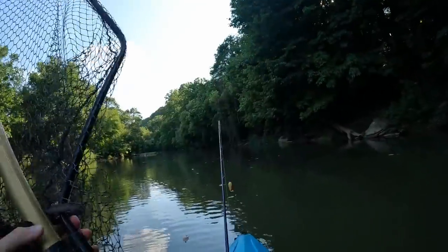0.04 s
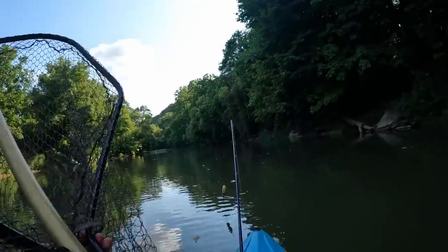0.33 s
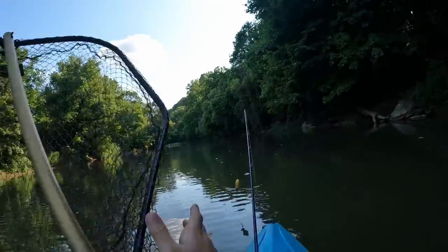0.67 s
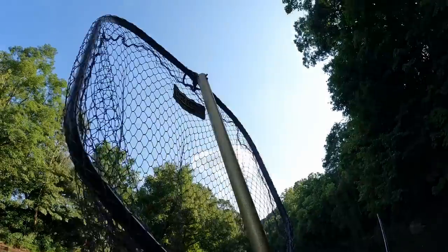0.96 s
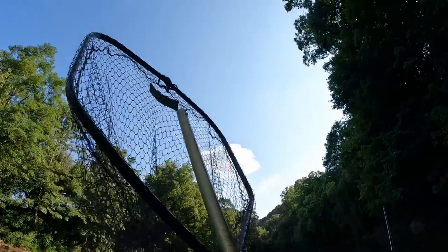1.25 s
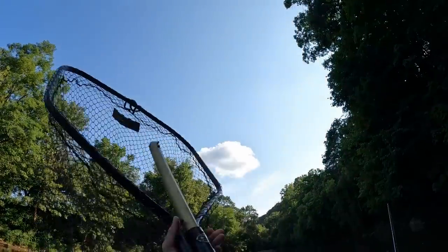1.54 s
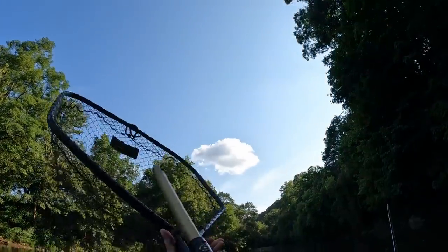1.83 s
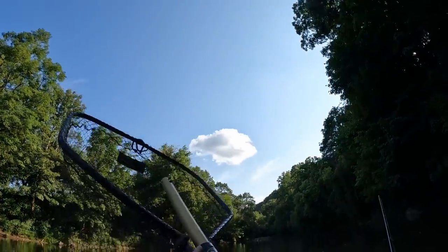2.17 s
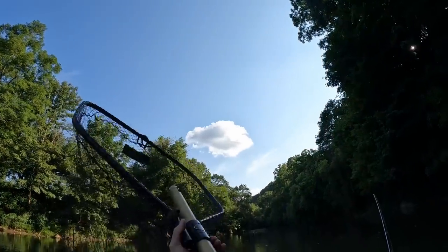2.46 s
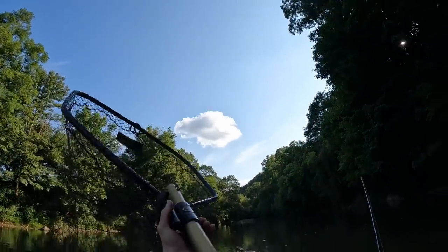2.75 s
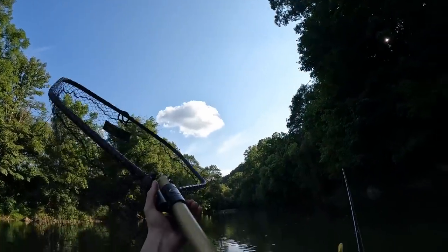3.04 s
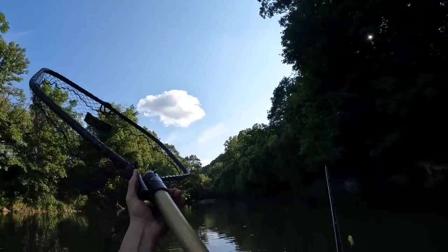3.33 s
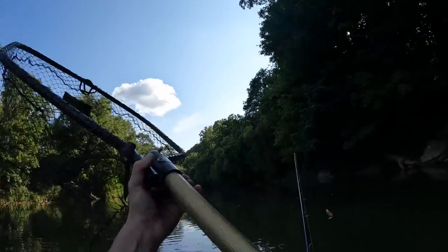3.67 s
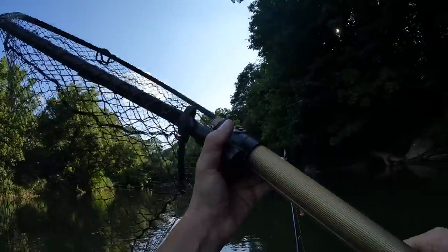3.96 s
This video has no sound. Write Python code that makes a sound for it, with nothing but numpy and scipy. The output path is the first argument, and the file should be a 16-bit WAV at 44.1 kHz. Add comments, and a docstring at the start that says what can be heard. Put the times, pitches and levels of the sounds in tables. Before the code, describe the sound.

A landing net's telescoping handle is pushed together close to the microphone: knocks and mesh rustle, one long scrape, three short shoves, then a loud locking snap. Faint insects hiss over a low, distant drone on a calm river.

```python
"""A small boat on a calm river, where a landing net's telescoping handle is pushed together.
The frame knocks as it is gripped; hand and mesh rub, rustle and squeak. The tube scrapes through its
collar in one long slide and three shoves, then the lock snaps home and jolts the boat.
Wooded banks echo faintly; insects hiss in the trees over a low, distant drone."""
import sys
import numpy as np
from scipy import signal
from scipy.fft import rfft, irfft, next_fast_len
from scipy.io import wavfile

SR = 44100
rng = np.random.default_rng(int(sys.argv[2]) if len(sys.argv) > 2 else 0)


def int16_out(signal):
    """Quantize to a 16-bit WAV file."""
    q = np.round(np.clip(np.atleast_2d(signal).T, -1, 1) * 32767)
    wavfile.write(sys.argv[1], SR, q.astype(np.int16))


N = 176400
TIME = np.arange(N) / SR

# Partials of the distant drone: pitch_hz, waver_hz, level_db
DRONE_PARTIALS = [(55,0.73,-41),(64.2,4.04,-48.5),(85.7,2.08,-49),(121.4,2.48,-50),(132.3,4.06,-55),(217.6,2.03,-62)]
# Fader ride on the drone: time_s, gain_db
DRONE_SWELL = [(.3,-6),(1.3,-1.5),(2.5,0.5),(3.5,-2.5)]
# Tone of the still air: freq_hz, gain_db
AIR_EQ = [(25,-5),(45,-3),(110,-14),(170,-17),(300,-25.5),(500,-34),(850,-39.5),(1100,-29.5),(1500,-30.5),(2300,-40),(3700,-44.5),(5900,-37.5),(8500,-44),(13000,-56.5),(15500,-73)]
# Narrow hiss band of the insects: freq_hz, gain_db
INSECT_EQ = [(5000, -49), (6500, -13), (7000, -2), (7600, -2.5), (8050, -17), (9000, -42)]
# How alike left and right are in the ambience: freq_hz, correlation
BED_CORRELATION = [(50,0.86),(7000,0.62),(13000,0.3)]
# Tone of the echo off the wooded banks: freq_hz, gain_db
BANK_EQ = [(200,0),(1300,-7),(5000,-5),(8000,-24),(14000,-4)]
# Tone of the close reflections off the boat: freq_hz, gain_db
BOAT_EQ = [(200,-13.5),(2000,-1.5),(6000,-15),(12000,-6)]

# Hand and mesh rubbing the shaft: start_s, attack_s, hold_end_s, release_s, level_db, hold_change_db
RUBS = [(.52,.036,0.71,.06,-51,-2),(.72,0.032,1.03,0.035,-50,3.5),(.98,0.038,1.37,.12,-50,3),(1.75,0.11,2.97,0.13,-61.5,4),(2.87,0.013,3.256,0.099,-47,0)]
# Tone of the rubbing: freq_hz, gain_db
RUB_EQ = [(150,-3),(400,-1),(800,-7),(1300,0),(2300,-8.5),(5500,-13),(9000,-33),(15000,-41)]
# Resonances of the rubbed shaft: pitch_hz, width_hz, gain_db
SHAFT_MODES = [(2960,170,1.5),(3800,120,3.5)]
# The net rustling as it swings: start_s, attack_s, hold_end_s, release_s, level_db, hold_change_db
RUSTLES = [(-.05,0.035,0.067,0.048,-37,-4),(.05,0.069,0.17,0.31,-43.5,0.5),(3.334,0.024,3.44,.04,-42,4),(3.65,.25,3.84,0.13,-59,8)]
# Tone of the rustle: freq_hz, gain_db
RUSTLE_EQ = [(150,1),(1500,-0.5),(4200,-7),(5700,3),(7100,0),(8500,-10),(12000,-20.5),(15500,-38)]
# Mesh squeaks: start_s, pitch_hz, level_db
SQUEAKS = [(.745,3860,-47.5),(.808,4360,-48),(.866,5100,-51),(.953,5250,-48)]

# Frame and tube knocking together: start_s, thud_db, crack_db, ring_hz, frame_vs_thud_db, crack_hz
KNOCKS = [(0.0304,-50,-39,810,-8,6000),(0.04,-52,-33.5,790,-6,7200),(.0598,-46,-42.5,900,-1,4400),(0.141,-60,-41,1310,-12,8200),(0.1477,-24.5,-29.5,975,-7,5300),(0.1556,-30,-34,1080,-7,6850),(.424,-50,-70,1540,-22,1600),(0.6162,-34.5,-36,1020,-1,7000),(0.6303,-38,-41,980,1,5400),(0.6445,-22.5,-20.5,1660,1.5,5000),(.986,-39,-47,1140,-1,3500),(1.2105,-39,-29.5,1300,-6,5600),(1.226,-44,-31,1310,-7,3800),(1.2824,-39,-28,1430,-9,8000),(1.3153,-32,-36,1113,-18,4200),(1.348,-28.5,-39,930,-14,2500),(1.3598,-34.5,-40,923,-15,4600),(1.45,-41,-38,1075,-4,4970),(1.6465,-25.5,-32,1136,-25,3100),(2.694,-64,-45.5,1300,-12,5000),(2.796,-33.5,-28.5,1450,-8,3300),(2.817,-34.5,-41,1940,-12,2500),(3.0,-64,-42.5,1500,-10,7500),(3.119,-39.5,-46,1880,-24,2300)]
# Hollow body of a knock: freq_hz, gain_db
THUD_EQ = [(100,-27.5),(280,-4.5),(550,-3),(950,7),(1500,9),(4500,-4),(9000,-30.5)]
# Bright edge of a knock: freq_hz, gain_db
CRACK_EQ = [(500,-41),(2200,-24),(3600,2),(5100,4.5),(6000,0),(7100,6.5),(8400,-5.5),(12500,-17),(15500,-39)]
# Modes of the net frame: pitch_hz, gain_db, t60_s
FRAME_MODES = [(294,-4,0.07),(472,-15.5,0.066),(835,-6.5,0.047),(1125,-6,0.051),(1970,-0.5,0.025),(3770,-6,.03)]

# Friction envelope of the long slide: time_s, level_db
SLIDE_ENVELOPE = [(1.12,-66),(1.17,-37),(1.2,-36.5),(1.22,-26),(1.26,-33.5),(1.38,-31),(1.43,-38),(1.49,-40.5),(1.6,-32.5),(1.69,-33),(1.78,-38.5),(1.805,-63)]
# The three short shoves: start_s, attack_s, hold_end_s, release_s, level_db, hold_change_db
SHOVES = [(2.388,0.076,2.627,0.018,-26.5,-10),(2.747,0.047,2.856,0.073,-29,3),(3.069,0.039,3.185,0.033,-27,-4.5)]
# Tone of the tube grating in the collar: freq_hz, gain_db
SCRAPE_EQ = [(150,-10.5),(600,-14.5),(1050,-3.5),(2100,0),(2700,-1),(4400,-1),(6100,-1),(7000,3),(8100,-5.5),(9600,-7.5),(13000,-22.5),(15500,-38)]
# Resonances of the scraped tube: pitch_hz, width_hz, slide_db, shove1_db, shove2_db, shove3_db
TUBE_MODES = [(1180,130,-7,-4,-14,-7),(1960,104,-7,-11,6.5,-4),(2146,50,5.5,-14,1,4.5),(2316,68,-4,-3,3,2),(2705,60,-1,-13,4,-4),(3127,39,10,5.5,6,-2),(3865,40,-1,5,1,-1),(5550,130,0.5,1.5,-10,3.5)]

# The lock snapping home: start_s, level_db, pitch_hz, collar_ring_db
SNAPS = [(3.38,-16,6800,-12),(3.3882,-11,6740,-13),(3.399,-10,6500,-11),(3.4114,-16.5,4900,2),(3.418,-22.5,4900,-6),(3.428,-9,5650,3)]
# Tone of the snaps: freq_hz, gain_db
SNAP_EQ = [(150,-31),(700,-23.5),(1300,0.5),(1650,-11),(2050,-3),(3300,-3),(4900,2),(6800,2.5),(8500,-5.5),(12000,-10.5),(15500,-35)]
# Resonances of the collar: pitch_hz, width_hz, gain_db
COLLAR_MODES = [(2205,100,4),(3120,69,5),(4500,150,-9)]

# Pan ride on the handle: time_s, left_minus_right_db
HANDLE_PAN = [(0,3),(.7,3),(1.3,0),(2.6,0.5),(3.4,0)]
# Stereo lean of the close sounds across the spectrum: freq_hz, left_minus_right_db
CLOSE_BALANCE = [(60,-12),(290,-3),(640,2),(3100,-1),(6820,0),(15000,5.5)]


def from_db(db):
    """Decibels to gain."""
    return 10 ** (np.asarray(db) / 20)


def unit_rms(x):
    """Scale to unit rms."""
    return x / np.sqrt(np.mean(x ** 2) + 1e-20)


def automation(points):
    """Straight ramps between breakpoints in time."""
    return np.interp(TIME, *np.transpose(points))


def at_hz(points, hz):
    """Read a curve on a log-frequency axis."""
    freqs, values = np.transpose(points)
    return np.interp(np.log(hz + 1), np.log(freqs), values)


def equalise(x, eq):
    """Minimum-phase EQ of unit power gain: nothing rings ahead of a hit."""
    size = 2 * next_fast_len(x.shape[-1])
    gain = unit_rms(from_db(at_hz(eq, np.arange(size // 2 + 1) * SR / size)))
    cepstrum = irfft(np.log(gain))
    cepstrum[1:size // 2] *= 2
    cepstrum[size // 2 + 1:] = 0
    return irfft(rfft(x, size) * np.exp(rfft(cepstrum)))[..., :x.shape[-1]]


def resonance(x, hz, width_hz):
    """Ringing band-pass with unity gain at its peak."""
    radius = np.exp(-np.pi * width_hz / SR)
    feedback = [1, -2 * radius * np.cos(2 * np.pi * hz / SR), radius ** 2]
    return signal.lfilter(np.array([1, 0, -1]) * (1 - radius ** 2) / 2, feedback, x)


def drift(hz):
    """Random modulator of unit rms, rolled off above hz."""
    lowpass = signal.butter(2, hz, fs=SR, output="sos")
    return unit_rms(signal.sosfilt(lowpass, rng.standard_normal(N + SR))[SR:])


def add(out, start_s, x):
    """Mix x in at its cue."""
    i = int(start_s * SR)
    out[..., i:i + x.shape[-1]] += x[..., :N - i]


def ping(t, hz, db, t60_s):
    """One struck mode: a dying sine."""
    return from_db(db - 60 * t / t60_s) * np.sin(2 * np.pi * hz * t)


def burst(decay_s, rise_s):
    """A contact scatters into dense, dying reflections, with the energy of 10 ms at unit power."""
    t = TIME[:SR // 5]
    x = rng.choice([-1, 1], len(t)) * from_db(-60 * t / decay_s) * (1 - np.exp(-(t / rise_s) ** 2))
    for _ in range(2):  # flatten the tone, then tighten the envelope again
        spectrum = rfft(x)
        white = irfft(spectrum / (abs(spectrum) + 1e-9))
        x = white * from_db(-15 * t / decay_s) * (1 - np.exp(-t / rise_s))
    return x * np.sqrt(SR / 100 / np.sum(x ** 2))


def strokes(rows, fade_db=29):
    """Gain envelope of hand strokes: attack, sloping hold, release."""
    gain = np.zeros(N)
    for start, attack, hold_end, release, db, change in rows:
        times = [start, start + attack, hold_end, hold_end + release]
        levels = [db - fade_db, db, db + change, db + change - fade_db]
        gain += from_db(np.interp(TIME, times, levels, left=-200, right=-200))
    return gain


def friction(eq, slips_per_s, spread_db, judder_db, judder_hz):
    """Friction texture: tiny slips of uneven size come in clumps."""
    slips = (rng.random(N) < slips_per_s / SR) * rng.choice([-1, 1], N)
    sizes = from_db(spread_db * np.minimum(rng.exponential(1, N), 4))
    clumps = from_db(judder_db * drift(judder_hz))
    return unit_rms(equalise(slips * sizes * clumps, eq))


def stereo(mid, side, correlation):
    """Blend mid and side into left and right; lower correlation is wider."""
    return np.sqrt(1 + correlation) * mid + np.sqrt(1 - correlation) * side * [[1], [-1]]


def noise_bed(eq):
    """Stereo noise that widens towards the treble."""
    correlation = at_hz(BED_CORRELATION, np.arange(N // 2 + 1) * SR / N)
    mid, side = rfft(rng.standard_normal((2, N)))
    return unit_rms(equalise(irfft(stereo(mid, side, correlation)), eq))


def river_ambience():
    """The bed: a wavering drone far away, still air and insects hissing in the trees."""
    drone = np.zeros(N)
    for hz, waver_hz, db in DRONE_PARTIALS:
        pitch_hz = hz + waver_hz * drift(hz=2.96)
        drone += from_db(db) * unit_rms(np.sin(2 * np.pi * np.cumsum(pitch_hz) / SR))
    air = from_db(-42.5 + 0.9 * drift(hz=4.7)) * noise_bed(AIR_EQ)
    insects = from_db(-55.5) * noise_bed(INSECT_EQ)
    return drone * from_db(automation(DRONE_SWELL)) + air + insects


def reflections(x, eq, predelay_s, t60_s, correlation):
    """Reverb return: surfaces scatter the sound into diffuse echoes, different at each ear."""
    mid, side = rng.standard_normal((2, SR)) * from_db(-60 * TIME[:SR] / t60_s)
    tail = stereo(mid, side, correlation)
    tail = equalise(tail / np.sqrt(np.sum(tail ** 2) / 2), eq)
    out = np.zeros((2, N))
    add(out, predelay_s, signal.fftconvolve(x[None], tail, axes=1))
    return out


def boat_jolt(start_s):
    """A sub bump: the handle's stop jolts the boat."""
    return -ping(np.maximum(TIME - start_s, 0), hz=35.6, db=-22, t60_s=0.27)


def handling():
    """Smooth rubbing makes the shaft sing faintly; the mesh rustles with a coarser grain."""
    rub = friction(RUB_EQ, slips_per_s=12000, spread_db=2.5, judder_db=2.5, judder_hz=39.3)
    shaft = sum(from_db(db) * resonance(rub, hz, width) for hz, width, db in SHAFT_MODES)
    rustle = friction(RUSTLE_EQ, slips_per_s=3700, spread_db=3.5, judder_db=2.0, judder_hz=80)
    return strokes(RUBS) * unit_rms(rub + shaft) + strokes(RUSTLES) * rustle


def mesh_squeaks():
    """The mesh sticks and slips on the shaft in tiny squeaks."""
    out = np.zeros(N)
    swell = np.hanning(int(0.02 * SR))
    for start_s, hz, db in SQUEAKS:
        squeak = unit_rms(resonance(rng.standard_normal(len(swell)), hz, width_hz=220))
        add(out, start_s, from_db(db) * swell * squeak)
    return out


def frame_knocks():
    """Frame hits tube in three layers: a hollow thud, a bright pitched crack and a short ring of both."""
    thuds, cracks, rings = np.zeros((3, N))
    t = TIME[:SR // 5]
    for start_s, thud_db, crack_db, ring_hz, frame_db, crack_hz in KNOCKS:
        add(thuds, start_s, from_db(thud_db) * burst(decay_s=0.043, rise_s=0.00019))
        crack = burst(decay_s=0.029, rise_s=0.00026)
        crack_tone = from_db(4) * resonance(crack, crack_hz, width_hz=560)
        add(cracks, start_s, from_db(crack_db) * (crack + crack_tone))
        frame = sum(rng.choice([-1, 1]) * ping(t, *mode) for mode in FRAME_MODES)
        tube = ping(t, ring_hz, db=1.5, t60_s=0.058)
        add(rings, start_s, from_db(thud_db) * (tube + from_db(frame_db) * frame))
    return equalise(thuds, THUD_EQ) + from_db(-3) * equalise(cracks, CRACK_EQ) + rings


def tube_scrape():
    """The tube grates through the collar, ringing differently each stroke; grit catches in the shoves."""
    grating = friction(SCRAPE_EQ, slips_per_s=4500, spread_db=2.5, judder_db=1.82, judder_hz=79)
    sliding = (TIME > SLIDE_ENVELOPE[0][0]) & (TIME < SLIDE_ENVELOPE[-1][0])
    slide = from_db(automation(SLIDE_ENVELOPE)) * sliding * grating
    catches = (rng.random(N) < 130 / SR) * rng.uniform(-1, 1, N)  # about 130 a second
    grit = from_db(-11.5) * unit_rms(resonance(catches, hz=1900, width_hz=1000))
    moves = np.array([slide] + [strokes([shove]) * (grating + grit) for shove in SHOVES])
    ringing = np.zeros(N)
    for hz, width_hz, *sends_db in TUBE_MODES:
        drive = from_db(sends_db) @ moves
        wander = from_db(4.5 * drift(hz=8.8))  # each mode comes and goes as the contact point moves
        ringing += resonance(drive * wander, hz, width_hz)
    return from_db(-3.5) * moves.sum(axis=0) + from_db(-4.5) * ringing


def lock_snaps():
    """The lock seats in a quick run of bright, rattling snaps; the later ones ring the collar more."""
    out = np.zeros(N)
    for start_s, db, hz, collar_db in SNAPS:
        snap = burst(decay_s=0.015, rise_s=0.00098)
        rattle = from_db(-3.5) * burst(decay_s=0.056, rise_s=0.00098)
        tone = from_db(7.5) * resonance(snap, hz, width_hz=350)
        collar = sum(from_db(gain_db) * resonance(snap, mode_hz, width_hz)
                     for mode_hz, width_hz, gain_db in COLLAR_MODES)
        add(out, start_s, from_db(db) * (snap + rattle + tone + from_db(collar_db) * collar))
    return from_db(-8.3) * equalise(out, SNAP_EQ)


def close_image(x, left_lag_s=0.000012):
    """Each side hears the close sounds with its own colour, the left a touch late."""
    hz = np.arange(N // 2 + 1) * SR / N
    left = from_db(at_hz(CLOSE_BALANCE, hz) / 2) * np.exp(-1j * np.pi * hz * left_lag_s)
    return irfft(rfft(x) * np.array([left, 1 / left]))


def scene():
    """The mix: the handle up front, reflected by boat and banks, over the river bed of air and insects."""
    handle = tube_scrape() + handling() + mesh_squeaks() + lock_snaps() + frame_knocks()
    pan_db = automation(HANDLE_PAN)
    direct = handle * from_db([pan_db / 2, -pan_db / 2])
    boat = reflections(handle, BOAT_EQ, predelay_s=0.001495, t60_s=0.035, correlation=-0.22)
    banks = reflections(handle, BANK_EQ, predelay_s=0.06, t60_s=1, correlation=0)
    close = close_image(direct + from_db(-9.5) * boat)
    return close + from_db(-25) * banks + river_ambience() + boat_jolt(start_s=3.395)


def record(dry):
    """Master: clip any peaks at full scale, then cut the extreme top."""
    lowpass = signal.cheby2(12, 60, 16300, fs=SR, output="sos")
    return signal.sosfilt(lowpass, np.clip(dry, -1, 1))


dry = scene()
out = record(dry)
int16_out(out)
```